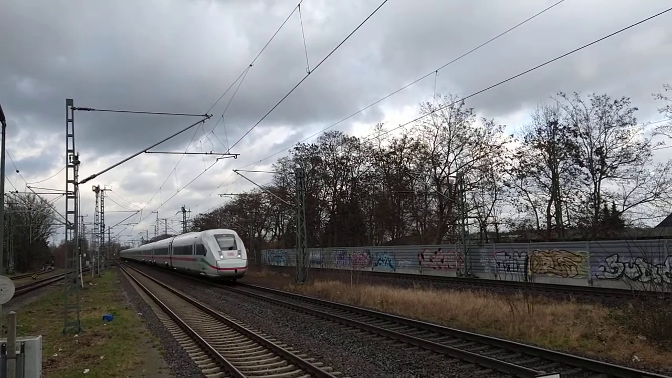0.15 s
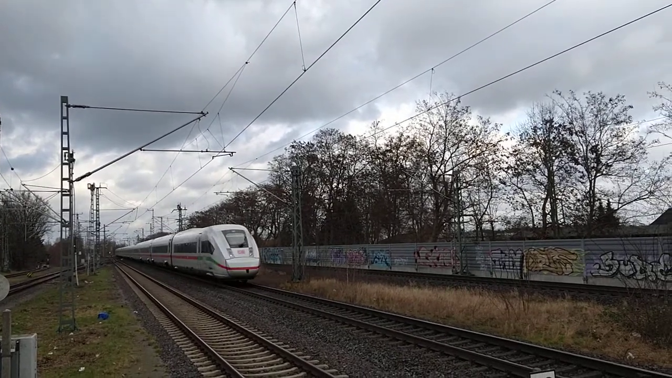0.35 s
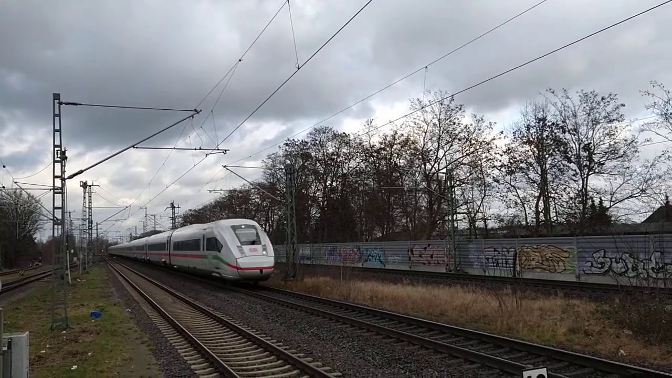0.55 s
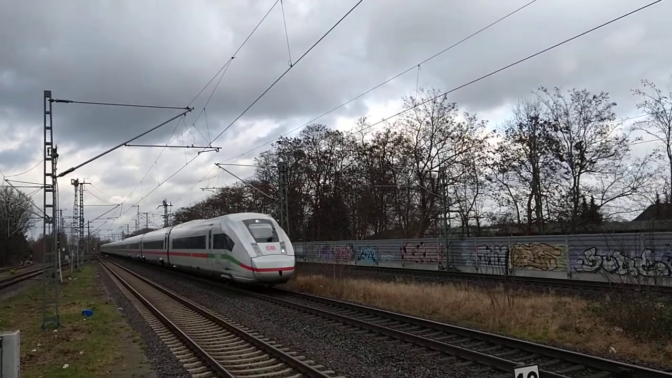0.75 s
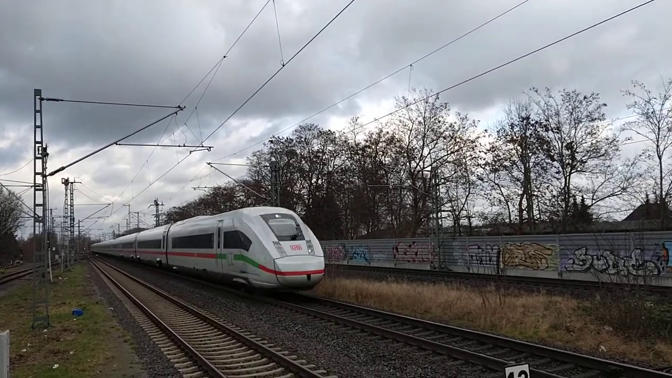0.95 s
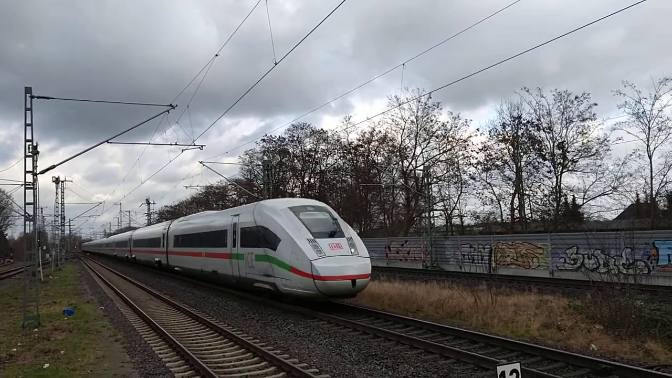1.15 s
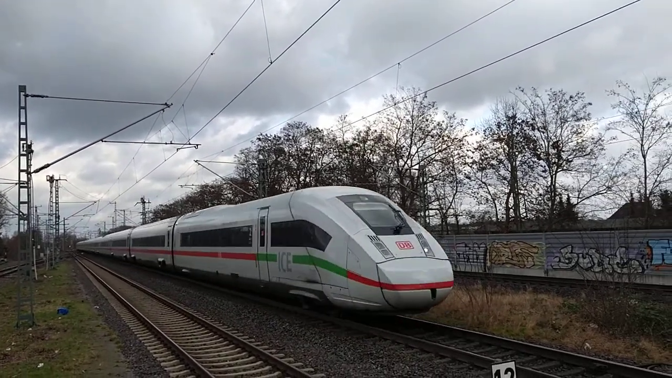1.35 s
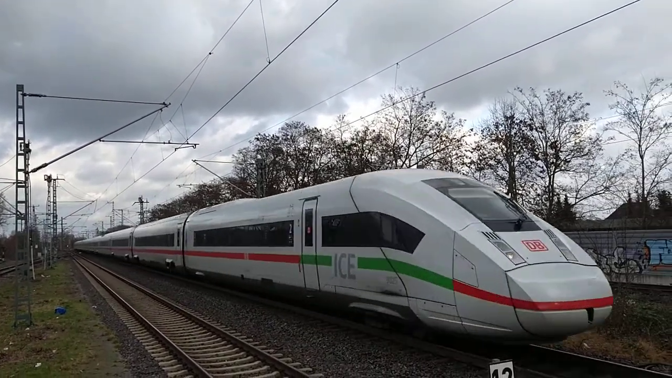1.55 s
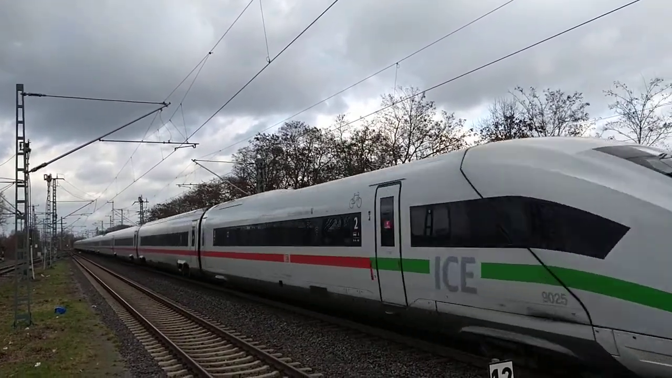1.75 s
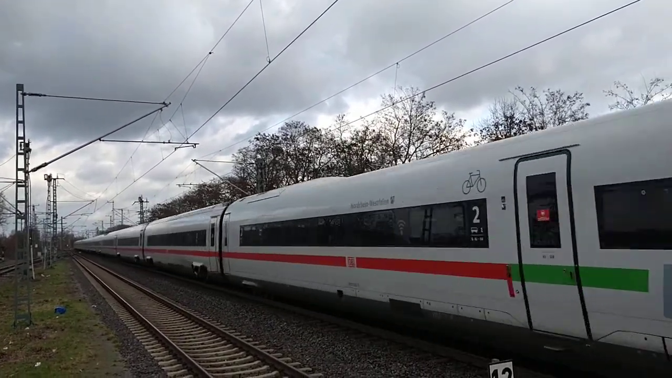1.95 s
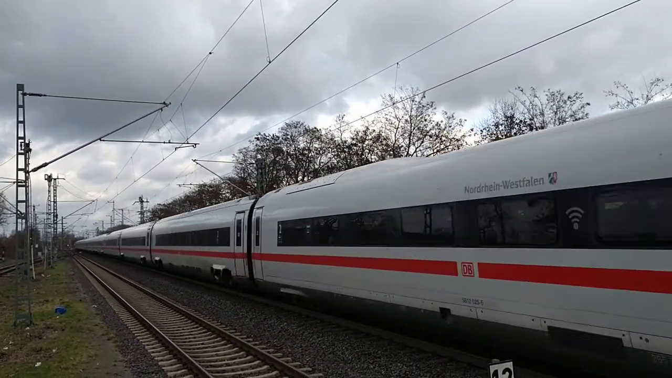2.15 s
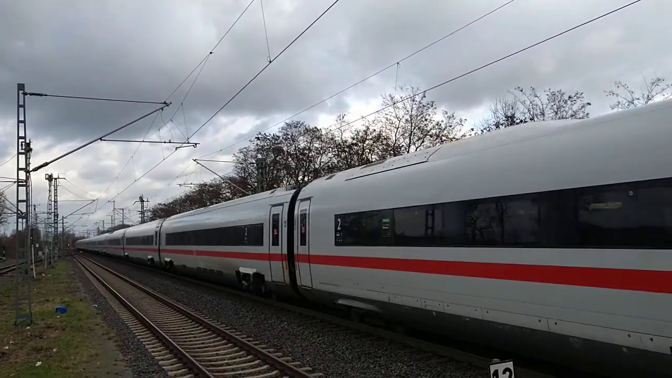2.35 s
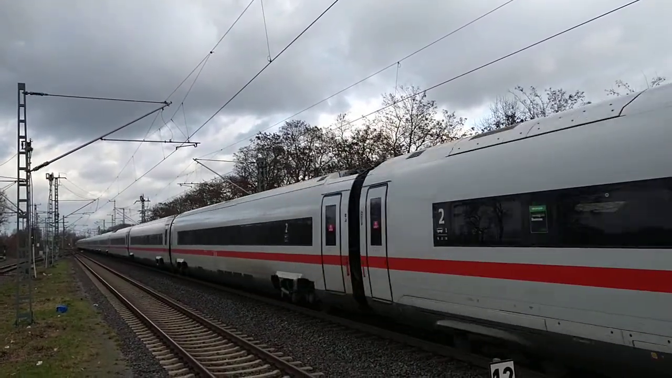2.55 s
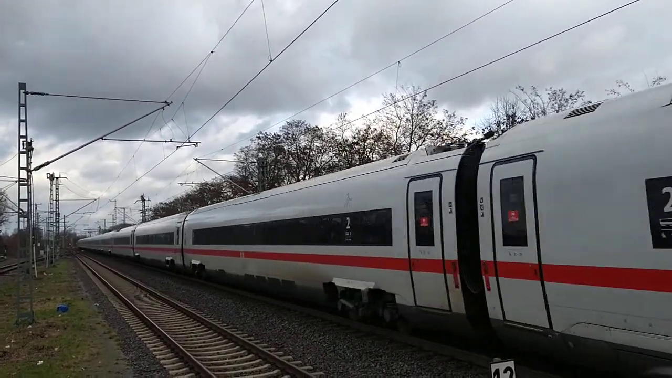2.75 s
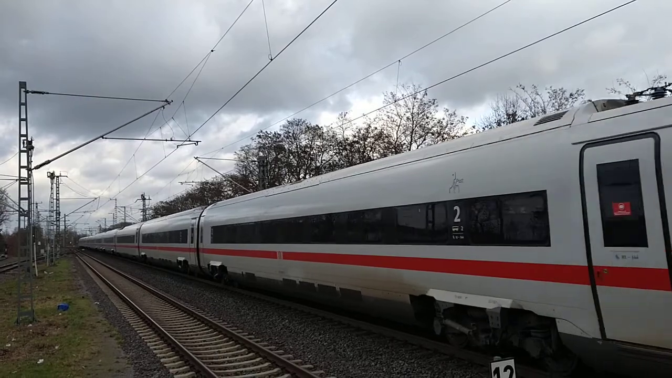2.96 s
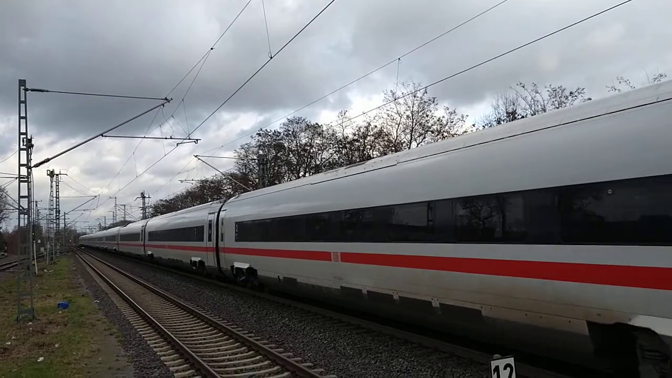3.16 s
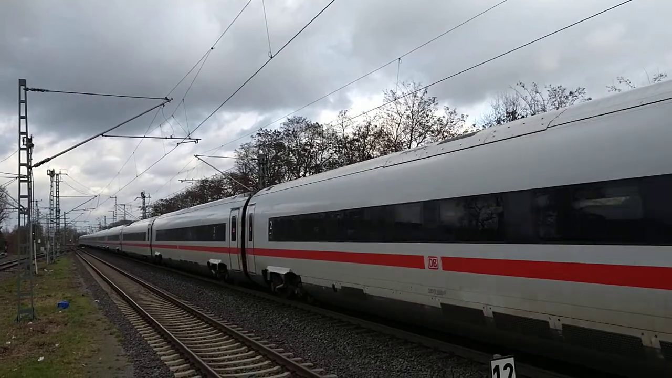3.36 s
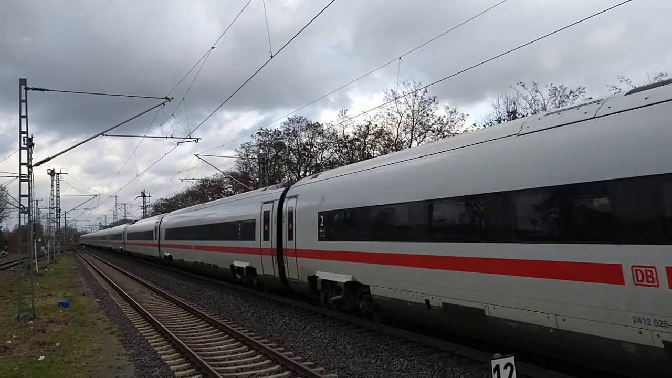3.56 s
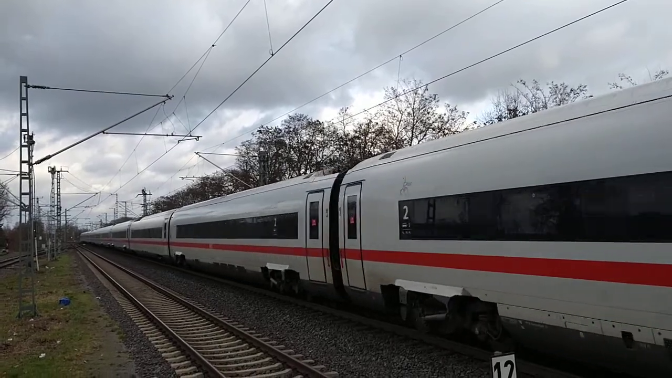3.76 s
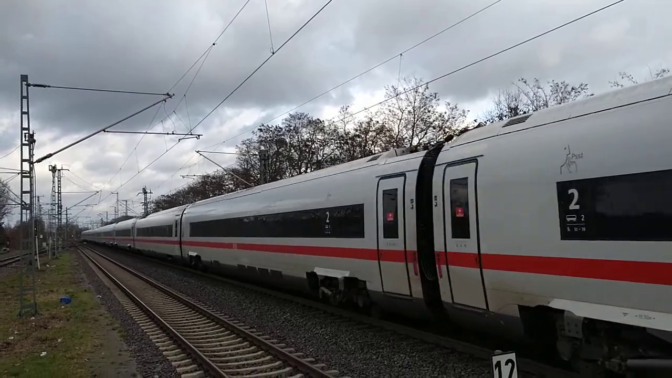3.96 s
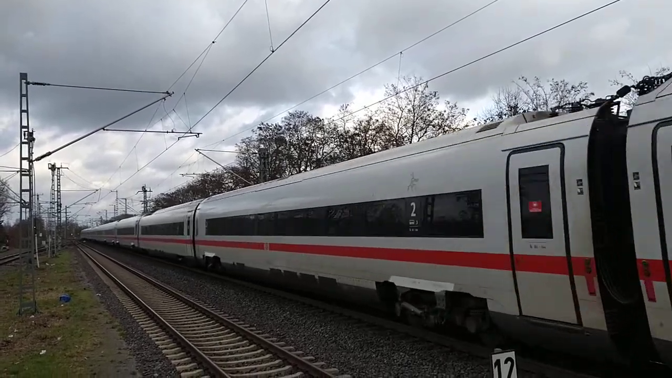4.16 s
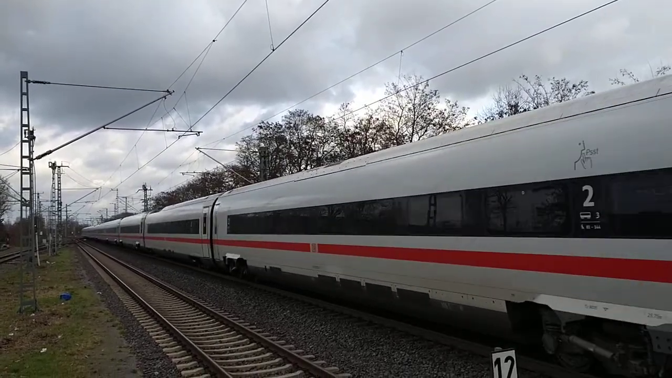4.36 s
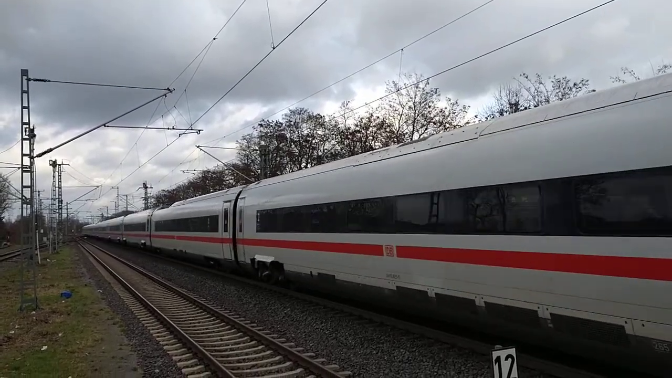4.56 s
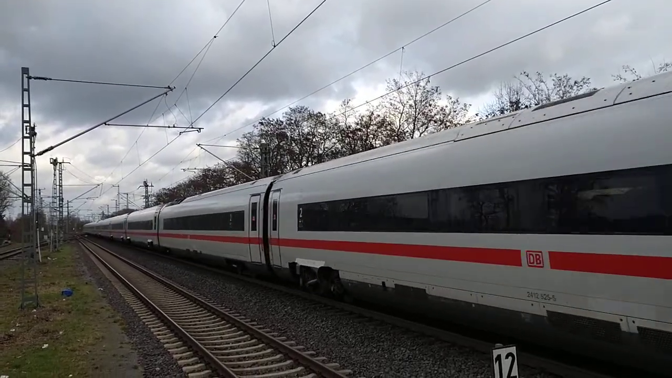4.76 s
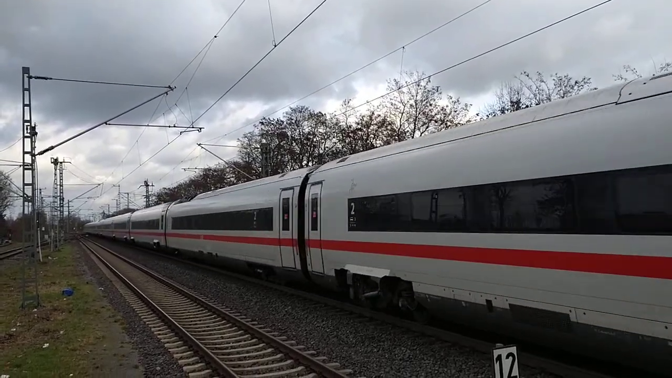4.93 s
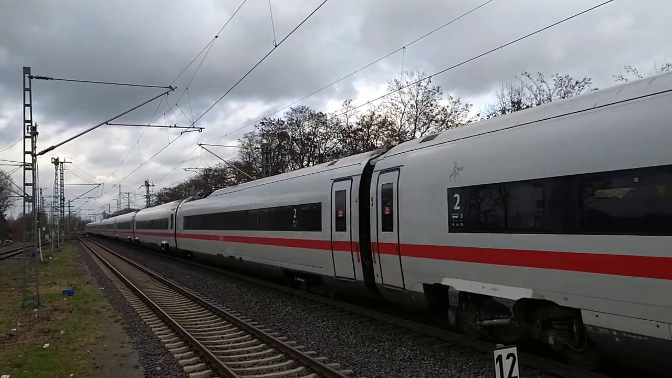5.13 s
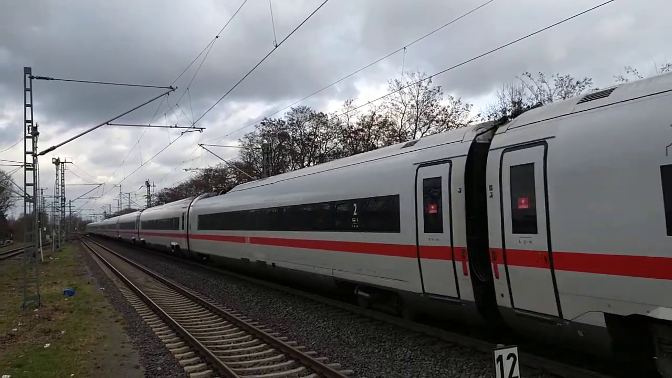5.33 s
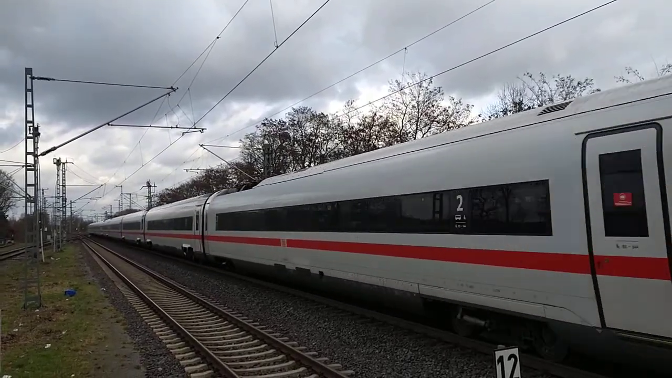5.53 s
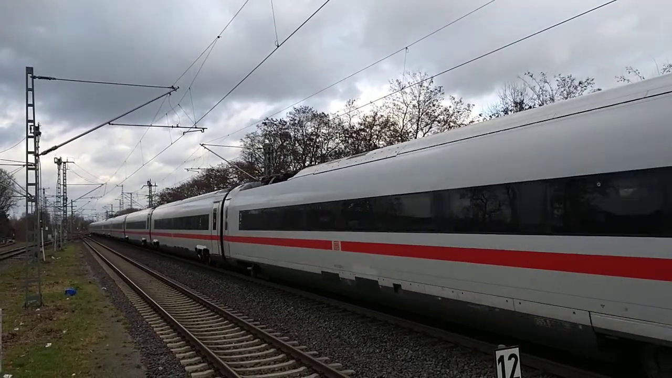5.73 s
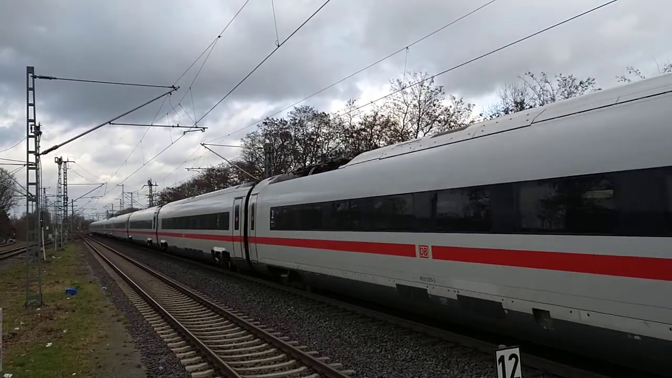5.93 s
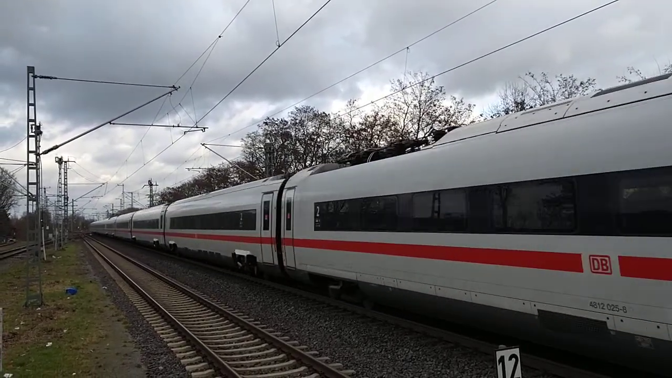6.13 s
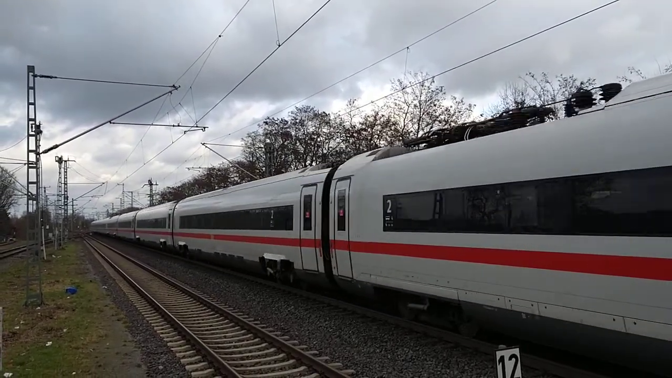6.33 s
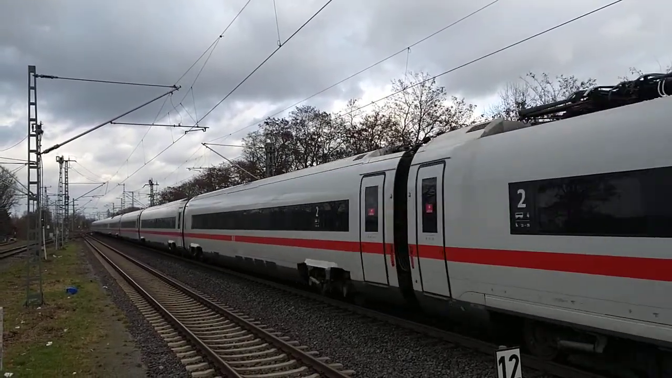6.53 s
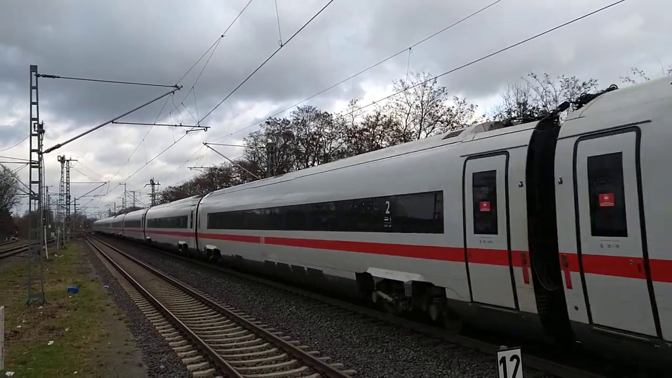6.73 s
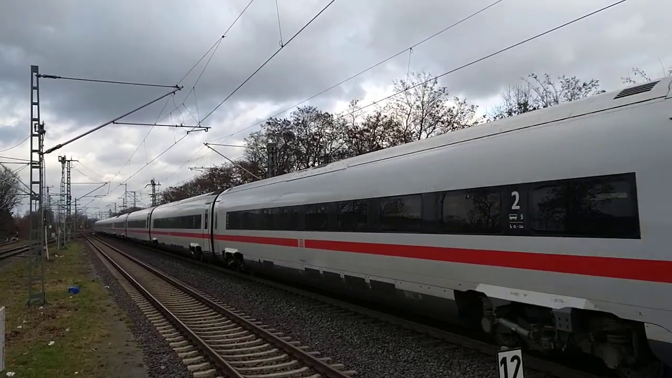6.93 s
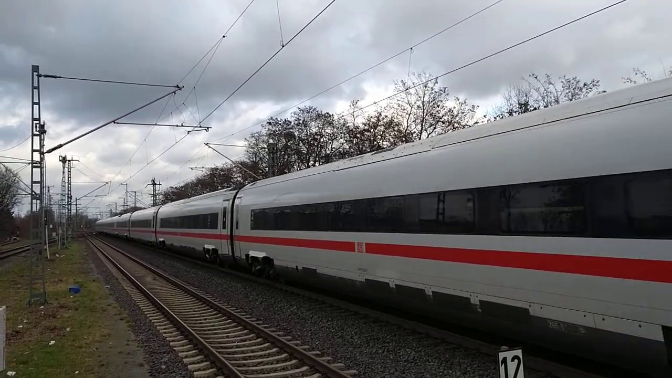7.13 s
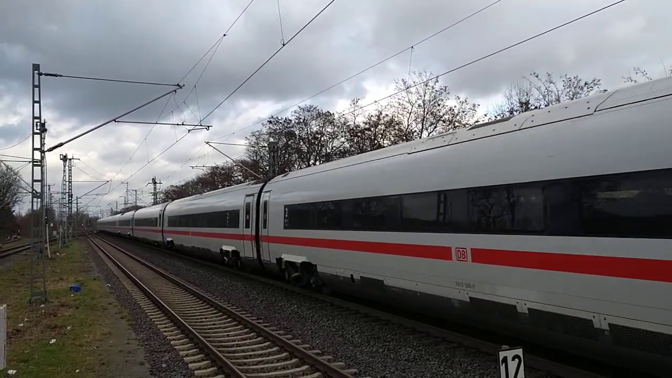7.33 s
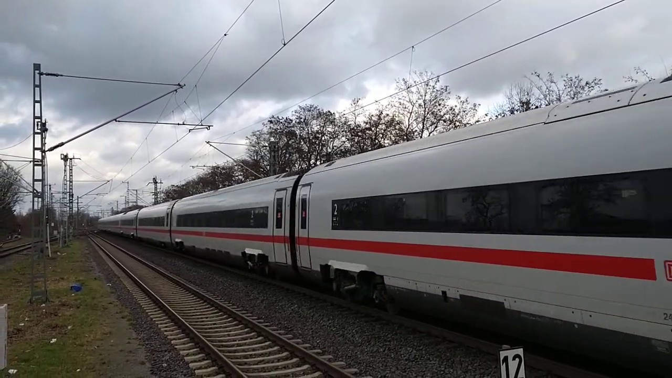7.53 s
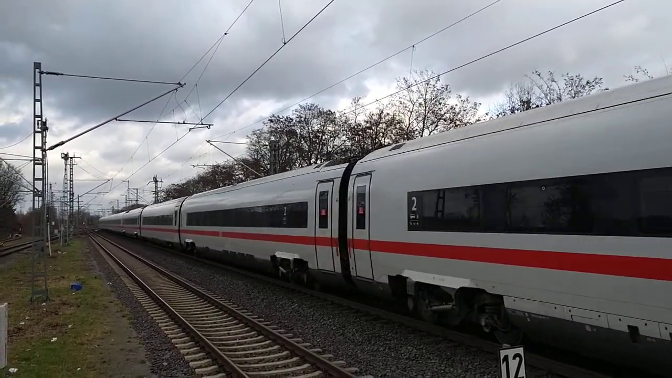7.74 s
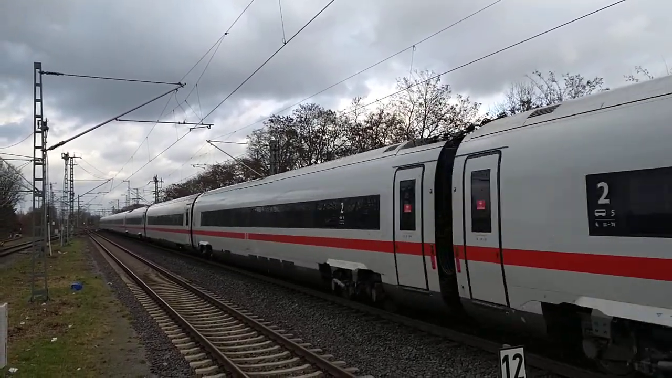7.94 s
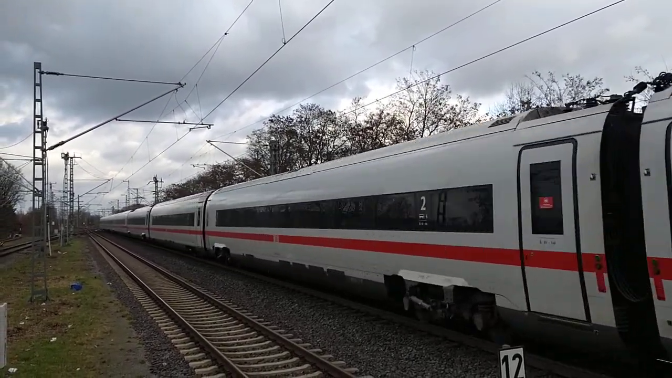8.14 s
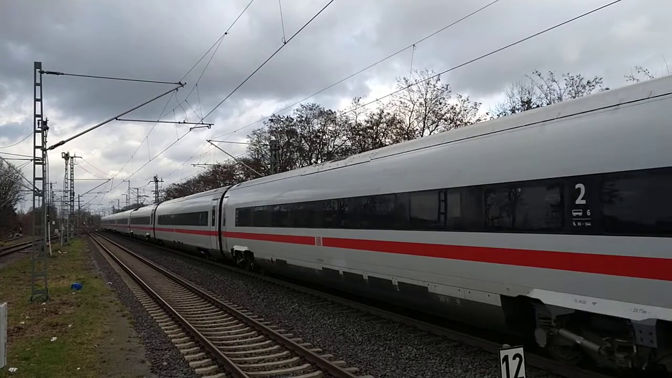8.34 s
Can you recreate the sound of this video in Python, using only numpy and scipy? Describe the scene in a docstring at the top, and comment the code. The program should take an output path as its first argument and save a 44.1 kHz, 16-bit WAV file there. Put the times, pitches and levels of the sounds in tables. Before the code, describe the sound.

A close stereo trackside microphone catches bumpy low wind, then the quickly swelling hiss and rumble of an electric train. Ringing wheel slaps tick about ten times a second until the front cars are alongside. Broad rushing noise surges with each set of wheels, coloured by breathy, wavering whines that fall as they pass. Later cars are smoother and quieter, ending in a softer hiss and whine with small wind bumps.

```python
"""Wind buffets a two-port microphone beside a railway; then an electric train, braking gently, runs past.
It passes 7 m away at its nearest. Rolling noise and air hiss are shaped noise sent from the bogies.
Whines are fuzzy tones that drop in pitch as they pass; two front wheels slap on a flat spot and ring.
Wind is lumpy low noise, unrelated between the ports, which gusts again as the train leaves."""
import sys
import numpy as np
from scipy import signal
from scipy.fft import rfft, irfft, next_fast_len
from scipy.io import wavfile
from scipy.ndimage import uniform_filter1d

SR = 44100
rng = np.random.default_rng(int(sys.argv[2]) if len(sys.argv) > 2 else 0)


def wrap_up_sound(samples):
    """Save the sound to the file named by the first command line argument, as 16-bit audio."""
    columns = np.atleast_2d(samples).T
    # keep every value between -1 and 1, then stretch to whole-number steps
    tamed = np.clip(columns, -1, 1)
    steps = np.round(tamed * 32767).astype(np.int16)
    wavfile.write(sys.argv[1], SR, steps)


N = 369999

# Place: m/s at the start, m/s lost each second, nearest distance in m
START_SPEED, BRAKING, TRACK_M = 24., .38, 7.
# Microphone: radians between track and microphone axis, longest delay between ports in s, top of the band
AIM_RAD, PORT_DELAY_S, EDGE_HZ = 0.46, 0.00042, 15650
# left minus right port: f/Hz, level/dB
PORT_COLOUR = [(60, -2), (99, 2), (160, 1), (270, 1), (450, 3), (740, 1), (1220, 2.5), (1500, 0.5),
               (1650, 3.5), (2010, -4), (3330, 5.5), (5500, -0.5), (9080, 7), (15000, 5)]
# phase by which the left port leads by itself: f/Hz, phase/rad
PORT_PHASE = [(100, 0), (380, -.2), (520, -.6), (820, -.3), (1000, -1.3), (1200, -2), (1450, -1),
              (1750, -.7), (1950, .9), (2200, .9), (2600, 1), (5000, 0)]
# share of the delay between ports that shows: f/Hz, share
DELAY_SHARE = [(300, .7), (520, .45), (820, .6), (1000, .1), (1200, .3), (1450, 1), (1750, 1), (1900, .25),
               (2700, .2), (12000, .12)]
# likeness of the ports for one bogie: f/Hz, likeness (held to 0..1)
PORT_LIKENESS = [(60, 0.99), (250, 1), (700, 0.8), (1600, 0.36), (2100, 0.44), (2700, 0.26), (4000, 0.029),
                 (12000, 0.086)]

# wind on the ports: middle t/s, half length/s, level/dB, left minus right/dB
GUSTS = [(0.02, 0.044, -23, 8), (0.077, 0.017, -22, 12), (0.14, 0.029, -23.5, 15), (0.18, 0.21, -32, 9),
         (0.204, 0.026, -23, 14), (0.266, 0.015, -22, -2), (0.346, 0.032, -23, 9), (0.403, 0.033, -37, 3),
         (0.512, 0.033, -41.5, 10), (0.795, 0.18, -40, -2), (1.297, 0.13, -43, -2), (1.95, 0.13, -33, -10),
         (2.542, 0.035, -38, 12), (7.917, 0.044, -43, -5.5), (8.135, .03, -37.5, -5),
         (8.194, 0.033, -38, 7), (8.238, 0.012, -28, -15), (8.37, .03, -41, 12)]
# wind spectrum: f/Hz, relative level per Hz/dB
WIND_COLOUR = [(15, -55), (25, -27), (73, -5), (102, -5.5), (325, -18.5), (397, -35), (430, -26.5),
               (460, -36), (600, -52), (780, -82), (1320, -120)]
BREEZE_DB = -64  # between the gusts

# wheels with a flat spot: first slap t/s, no slap from t/s, first turn/s, abreast t/s, level abreast/dB
FLAT_WHEELS = [(0.672, 2.86, .0982, 2.28, -15.5), (2.986, 3.3, .114, 2.94, -14)]
# ringing modes of a wheel, before motion shifts them: f/Hz, relative level/dB, t60/s
WHEEL_MODES = [(825, -2, 0.041), (1000, 6.5, 0.035), (1360, -3, 0.03), (1760, -4, 0.029),
               (3200, -24, 0.011), (4260, -11, 0.011)]
TURN_GROWS_S, FLAT_SPREAD_DB = .00055, 2.5  # each turn longer by this; spread of slap strength
FLAT_FADE = 1.4  # power of distance

# motor, gear and wheel whines: abreast t/s, f there/Hz, fuzz/Hz, loudest level/dB, loudest this far ahead/m,
# loss before/dB per m, loss after/dB per m (either loss is at least .1)
WHINES = [(2.3, 392, 10, -44.5, 24, 0.2, 0), (2.05, 988, 56, -36, 2.5, 1, 0.5),
          (2.45, 740, 36, -34, 16, .5, .2), (2.997, 2196, 180, -31, -3.5, 1, -0.5),
          (3.35, 1740, 55, -36, 2.5, 3, 1), (3.1, 1280, 17, -36, 0.5, 0.2, 0),
          (3.4, 2130, 46, -22.5, 4.5, 1, .55), (3.32, 3300, 380, -32, 0, 2, 2),
          (3.4, 2135, 16, -35, 24, .5, 1.5), (3.25, 2190, 170, -28, 1, 1.2, 1.2),
          (4.35, 2100, 170, -28, 0, 1, 1), (3.33, 789, 32, -29.5, 3, 1, 1.4),
          (3.5, 835, 17, -33, -3, 0.74, -1), (3.4, 378, 11, -30, -3.5, .6, 1.6),
          (3.55, 410, 9, -34, -3, .4, 1.5), (4.1, 2090, 35, -25.5, 4.5, 0.7, 0.1),
          (4.298, 845, 9.4, -30, 3.5, 0.5, 7), (4.25, 370, 10, -31, -5, 1.2, 1),
          (4.33, 402, 8, -31.5, -5, .8, 1.5), (4.8, 1680, 90, -35, 2.5, 0.2, -2.5),
          (4.67, 2060, 46, -22, 5.5, .5, 1.9), (4.67, 2060, 36, -34, -8, 1, .4),
          (4.73, 832, 22, -25, 0.5, 1.5, 1), (4.7, 368, 8, -29.5, -7, 1.2, 1),
          (4.9, 397, 8, -32.5, -8, .3, 2), (5.45, 364, 7, -31.5, -7, 1.2, .8),
          (5.6, 2020, 30, -26.5, 13.5, 2.2, 1.8), (5.6, 2020, 50, -27.5, 0, .6, 1.1),
          (5.6, 2020, 14, -36, -20, .4, 1), (5.72, 808, 30, -20.5, 5.5, 1.2, 1.2),
          (5.72, 808, 30, -22, -3, 1, 1.5), (5.1, 372, 57, -33.5, 0, .15, 0.15),
          (5.651, 397, 9.4, -34, 1.5, 1.9, 0), (6.2, 1610, 48, -35.5, 1.5, 0.5, 2),
          (7.25, 2745, 38, -41, -6.5, 2, 2.5), (6.6, 3100, 70, -42, 0, 2, 2),
          (7.3, 3650, 140, -40.5, 0, 1, 2), (7.33, 785, 32, -25.5, 10, 1, .75),
          (7.3, 1955, 44, -34.5, 5, .4, .9), (7.3, 1560, 32, -33, -3.5, .3, .9),
          (8.25, 699.5, 100, -40.5, 11.5, 2, 0), (8.3, 775, 32, -39, 9, 0.7, 2),
          (8.4, 320, 80, -42.5, 2, 1, 1), (8.3, 1915, 30, -41, 10.5, 2, 1),
          (8.22, 2700, 45, -44, 0, 1.5, .5), (8.35, 2110, 50, -47, 4, 0, 6),
          (8.3, 1524, 20, -34, 8, 2, 1.8), (8.3, 1524, 32, -28.5, .5, 1.6, 1.4),
          (8.38, 1145, 17, -40, 4, 2, 3), (8.301, 3055, 60, -42.5, 1, 2, 3)]
# loss at the right port for a whine square to the left port: f/Hz, loss/dB
SHADE = [(400, 0.5), (800, 2.5), (1500, 9), (2100, 4), (4000, 3)]
# phase the left port gains once a whine is behind the microphone body: f/Hz, phase/rad
BEHIND_PHASE = [(1700, 0), (1900, 2.9), (2400, 2.9), (2700, 0)]
SHADE_SHARP = 4  # power of the bearing: how narrow that shadow is
BEHIND_M, BEHIND_SPAN_M = 5.5, 1.5  # metres past abreast, and how gradually
BREAK_DB = 1  # spread of level as each whine comes and goes in short patches
BEAM_M = 2.5  # how rounded the top of each beam is
REACH_M, BEYOND_DB_PER_M = 22, 0.48  # past this distance along the track every whine fades faster

# bogies: abreast t/s, relative strength/dB
BOGIES = [(1.9, -12), (3.0, -6), (3.4, -1), (4.25, 1.5), (4.65, -4.5), (5.4, -6), (5.7, 2.5), (6.799, 5.5),
          (7.3, 7), (8.3, 1), (8.75, 5.5)]
# whole train: t/s, air hiss level/dB, rolling above the hiss/dB
RUSH_LEVELS = [(0.05, -59, 5), (0.186, -56, 1.5), (0.791, -46, -3), (1.84, -33.5, -4), (2.16, -31.5, -5.5),
               (2.61, -32, -3), (2.86, -29, -3.5), (3.37, -28, -2.5), (3.55, -29.5, -3.5),
               (3.75, -31, -3.5), (4.18, -27.5, -3), (4.6, -27, -5), (4.8, -29, -5), (5.02, -31, -4.5),
               (5.3, -29.5, -4.5), (5.62, -28, -4.5), (5.95, -29, -5.5), (6.27, -31, -5.5),
               (6.46, -31.5, -5), (6.88, -29.5, -4.5), (7.25, -32, -3), (7.76, -39.5, -7),
               (8.27, -37.5, -5.5), (8.39, -36.5, -7.5)]
# low bands: t/s, boom level/dB, rumble level/dB
LOW_LEVELS = [(0, -41, -46), (1, -42, -46), (1.4, -38.5, -39.5), (1.9, -34.5, -33.5), (2.5, -36.5, -35),
              (3.3, -34.5, -38.5), (3.7, -36, -39), (4.2, -45, -43.5), (5, -48, -44), (5.8, -55, -48),
              (6.6, -48, -49), (7.3, -49.5, -51), (7.9, -45.5, -48), (8.39, -40, -46)]
# spectra of boom and rumble: f/Hz, relative level per Hz/dB
BOOM_COLOUR = [(15, -57), (25, -27), (41, 3), (54, 7), (102, 6), (130, -15), (170, -31), (290, -120)]
RUMBLE_COLOUR = [(59, -32), (100, -19), (145, 0), (270, 1), (312, -5.5), (340, -3), (440, -9), (750, -120)]
# rolling while approaching (the ground echo carves notches), with the front cars alongside,
# and with the quieter rear cars: f/Hz, relative level per Hz/dB
ROLL_FAR = [(150, -37), (250, -39.5), (371, -20), (417, -20.5), (619, -10), (826, -3), (1080, -10.5),
            (1120, -5.5), (1190, -14.5), (1290, -15.5), (1420, -14), (1580, -9.5), (1780, -21), (2300, -8),
            (2610, -24.5), (3200, -22), (4160, -65), (7040, -120)]
ROLL_NEAR = [(120, -56), (200, -10.5), (322, -14.5), (379, -9), (483, -12.5), (623, -12), (824, -2),
             (958, -9.5), (1150, -9), (1320, -12.5), (1600, -9.5), (1830, -11), (2160, -6.5), (2340, -9),
             (2600, -17), (3200, -19), (4160, -18.5), (7040, -120)]
ROLL_REAR = [(120, -42), (200, -20), (287, -12), (345, -3.5), (506, -14.5), (616, -8.5), (795, -1.5),
             (873, -10), (1170, -8.5), (1290, -21), (1540, 4.5), (1860, -8.5), (2260, -2.5), (2570, -9),
             (3200, -12), (4160, -40), (7040, -120)]
# air hiss while approaching, and alongside: f/Hz, relative level per Hz/dB
HISS_FAR = [(1410, -26), (2400, 5.5), (2570, -32), (2800, -9), (3030, -23), (3200, -12), (3400, -14),
            (3540, -3.5), (3700, -14), (3900, -19), (4500, -19.5), (4850, -32), (5100, -21), (5400, -33),
            (5600, -17.5), (6400, -16.5), (6760, -12), (7560, -22.5), (8290, -4.5), (8550, -13),
            (8800, -20), (9100, -31), (9400, -19), (9800, -27), (10050, -11), (10500, -17), (10850, -26),
            (11100, -29), (11500, -33), (15000, -49), (22000, -120)]
HISS_NEAR = [(1410, -9), (2400, -38), (2680, -15), (3000, -8.5), (3370, -14), (4190, -5), (4870, -8.5),
             (5410, -6.5), (7320, -11), (9140, -12.5), (9760, -9.5), (11500, -25), (15000, -51),
             (22000, -120)]
# sizzle at the top while approaching, and alongside: f/Hz, relative level per Hz/dB
SIZZLE_FAR = [(6470, -15), (9800, 1), (11000, 4), (12100, -23), (12500, -1), (13200, -7), (13600, -22),
              (15500, -33)]
SIZZLE_NEAR = [(6470, -9.5), (11000, -12.5), (15500, -30)]
# one colour gives way to the next: t/s, span/s
ROLL_ARRIVES, HISS_ARRIVES, REAR_ARRIVES = (2.3, 0.27), (1.53, 0.21), (7.76, 0.48)
# above the hiss; alongside, the sizzle swings further than the hiss, and the near value holds at the pivot
SIZZLE_FAR_DB, SIZZLE_NEAR_DB = -12.5, -17.5
SIZZLE_SWING, SIZZLE_PIVOT_DB = 0.2, -30.5
HOP, SIZE = 256, 1024  # samples between noise frames, samples in a frame


def gain_of(db):
    """Turn dB into gain."""
    return 10 ** (np.asarray(db) / 20)


def read(points, hz):
    """Read a spectrum table at the given frequencies, straight along log frequency."""
    f, value = np.transpose(points)
    return np.interp(np.log(hz + 1), np.log(f + 1), value)


def band_gain(table, hz, lo, hi):
    """Gains of a spectrum whose power between lo and hi sums to 1."""
    g = gain_of(read(table, hz))
    return g / np.linalg.norm(g[(hz > lo) & (hz < hi)])


def complex_noise(*shape):
    """Complex noise of power 1."""
    pairs = rng.standard_normal((*shape, 2), np.float32)
    return pairs.view(np.complex64)[..., 0] * np.float32(np.sqrt(.5))


def smooth_noise(shape, width, axis=-1):
    """Slow random drift: noise averaged twice over a window, scaled to a spread of 1."""
    drift = rng.standard_normal(shape)
    for _ in range(2):
        drift = uniform_filter1d(drift, width, axis)
    return drift / drift.std()


def blend(first, then, when, t):
    """Let one gain give way to the next, evenly in dB, along an S-curve in time."""
    middle_s, span_s = when
    share = 1 / (1 + np.exp((middle_s - t[:, None]) / span_s))
    return first ** (1 - share) * then ** share


def sight(abreast_s, t):
    """Metres still ahead, distance, pitch factor and left-port delay of a point on the train."""
    speed, speed_abreast = START_SPEED - BRAKING * t, START_SPEED - BRAKING * abreast_s
    ahead = (abreast_s - t) * (speed + speed_abreast) / 2
    distance = np.hypot(ahead, TRACK_M)
    doppler = 1 / (1 - speed * ahead / distance / 343)
    pitch = speed / speed_abreast * doppler
    delay = PORT_DELAY_S * np.sin(np.arctan2(TRACK_M, ahead) - AIM_RAD)
    return ahead, distance, pitch, delay


def wind():
    """Turbulence on the ports: lumpy low noise, unrelated between them, swelling in short gusts."""
    size = next_fast_len(N)
    t, hz = np.arange(N) / SR, np.fft.rfftfreq(size, 1 / SR)
    white = rng.standard_normal((2, size))
    noise = irfft(rfft(white) * gain_of(read(WIND_COLOUR, hz)), size)[:, :N]
    noise *= gain_of(2.0 * smooth_noise((2, N), 600))
    power = gain_of(BREEZE_DB) ** 2
    for middle_s, half_s, db, pan_db in GUSTS:
        port_gain = gain_of([[db + pan_db / 2], [db - pan_db / 2]])
        power = power + port_gain ** 2 * np.exp(-2 * ((t - middle_s) / half_s) ** 2)
    return noise / noise.std() * np.sqrt(power)


def wheel_flat():
    """Each slap of a flat spot, once a turn of the slowing wheel, rings the wheel briefly."""
    out, t = np.zeros((2, N)), np.arange(4000) / SR
    turns = np.arange(24)
    for first_s, last_s, turn_s, abreast_s, db in FLAT_WHEELS:
        slaps = first_s + turn_s * turns + TURN_GROWS_S * turns ** 2 / 2
        for slap_s in slaps[slaps < last_s]:
            _, distance, pitch, delay = sight(abreast_s, slap_s)
            ring = np.zeros(len(t))
            for f, mode_db, t60 in WHEEL_MODES:
                phase = rng.uniform(0, 2 * np.pi)
                ring += gain_of(mode_db - 60 * t / t60) * np.sin(2 * np.pi * f * pitch * t + phase)
            ring *= gain_of(db + FLAT_SPREAD_DB * rng.standard_normal())
            ring *= (TRACK_M / distance) ** FLAT_FADE
            ring *= 1 - np.exp(-t / 0.0022)  # soft onset
            for port, late_s in enumerate((delay, 0)):
                at = round((slap_s + late_s) * SR)
                out[port, at:at + len(t)] += ring
    return out


def whines():
    """Fuzzy tones tied to wheel speed and shifted by the motion; each beams its own way and fades far off."""
    slow, out = np.arange(0, N / SR + 1, 1 / 800), np.zeros((2, N))
    for abreast_s, hz, fuzz_hz, db, top_m, before, after in WHINES:
        ahead, _, pitch, delay = sight(abreast_s, slow)
        pole = np.exp(-1.5 * np.pi * fuzz_hz * slow[1])
        waver = signal.lfilter([1], np.poly([pole, pole]), complex_noise(3, len(slow)))
        waver /= waver.std()
        ports = 0.41 + 0.72 * waver[0] + 0.41 * waver[1:]  # a steady core, shared fuzz, scattered fuzz
        pitch *= 1 + 0.00301 * smooth_noise(len(slow), 64)  # wheels creep and sway

        ports[0] *= np.exp(-2j * np.pi * hz * pitch * delay * read(DELAY_SHARE, hz))
        bearing = np.maximum(delay / PORT_DELAY_S, 0)
        ports[1] *= gain_of(-read(SHADE, hz) * bearing ** SHADE_SHARP)
        behind = 1 / (1 + np.exp(np.minimum((ahead + BEHIND_M) / BEHIND_SPAN_M, 50)))
        ports[0] *= np.exp(1j * read(BEHIND_PHASE, hz) * behind)

        off_m = np.hypot(ahead - top_m, BEAM_M) - BEAM_M
        level_db = db - np.maximum(np.where(ahead > top_m, before, after), .1) * off_m
        level_db -= BEYOND_DB_PER_M * np.maximum(abs(ahead) - REACH_M, 0)
        ports *= np.sqrt(2) * gain_of(level_db + BREAK_DB * smooth_noise(len(slow), 60))

        heard = slow[level_db > -66]
        at = np.arange(round(heard[0] * SR), min(round(heard[-1] * SR), N))
        tone_hz = np.interp(at / SR, slow, hz * pitch)
        turn = np.exp(2j * np.pi * np.cumsum(tone_hz) / SR)
        for k in range(2):
            out[k, at[0]:at[-1] + 1] += (np.interp(at / SR, slow, ports[k]) * turn).real
    return out


def bogie_noise(t, hz):
    """Every bogie sends its own noise from its own direction; ballast and the far wall scatter the rest."""
    shape = len(t), len(hz)
    direct, power = np.zeros((2, *shape), np.complex64), 0
    for abreast_s, db in BOGIES:
        _, distance, _, delay = sight(abreast_s, t)
        g = gain_of(db) / distance ** 1.09
        z = g[:, None] * complex_noise(*shape)
        lag = np.complex64(-2j * np.pi * delay[:, None] * hz * read(DELAY_SHARE, hz))
        direct[0] += z * np.exp(lag)
        direct[1] += z
        power = power + g ** 2
    like = np.clip(read(PORT_LIKENESS, hz), 0, 1)
    return np.sqrt(like / power[:, None]) * direct + np.sqrt(1 - like) * complex_noise(2, *shape)


def rush_power(t, hz):
    """Power of boom, rumble, rolling, hiss and sizzle added up, each spectrum following its own level."""
    (s, *high), (low_s, *low) = np.transpose(RUSH_LEVELS), np.transpose(LOW_LEVELS)
    air, roll = (gain_of(np.interp(t, s, c))[:, None] for c in high)
    boom, rumble = (gain_of(np.interp(t, low_s, c))[:, None] for c in low)
    power = (boom * band_gain(BOOM_COLOUR, hz, 40, 110)) ** 2
    power = power + (rumble * band_gain(RUMBLE_COLOUR, hz, 110, 280)) ** 2

    far, near, rear = (band_gain(c, hz, 1050, 1500) for c in (ROLL_FAR, ROLL_NEAR, ROLL_REAR))
    front = blend(far, near, ROLL_ARRIVES, t)
    power += (air * roll * blend(front, rear, REAR_ARRIVES, t)) ** 2

    far, near = (band_gain(c, hz, 2700, 10500) for c in (HISS_FAR, HISS_NEAR))
    power += (air * blend(far, near, HISS_ARRIVES, t)) ** 2

    swing = (air / gain_of(SIZZLE_PIVOT_DB)) ** SIZZLE_SWING
    near_gain = gain_of(SIZZLE_NEAR_DB) * swing
    sizzle = air * blend(gain_of(SIZZLE_FAR_DB), near_gain, HISS_ARRIVES, t)
    far, near = (band_gain(c, hz, 11000, 15600) for c in (SIZZLE_FAR, SIZZLE_NEAR))
    return power + (sizzle * blend(far, near, HISS_ARRIVES, t)) ** 2


def rush():
    """The body of the train: bogie noise coloured frame by frame, stirred in patches and all bands together."""
    frames, hz = N // HOP + 5, np.fft.rfftfreq(SIZE, 1 / SR)
    t = np.arange(frames) * HOP / SR
    power = rush_power(t, hz)
    patches = uniform_filter1d(uniform_filter1d(rng.standard_normal(power.shape), 12, 0), 14, 1)
    flutter = uniform_filter1d(rng.standard_normal(frames), 5)  # axles and gaps stir all bands together
    stir_db = 0.84 * patches / patches.std() + .5 * flutter[:, None] / flutter.std()
    # the 3 makes up for power that unrelated frames lose where they overlap
    z = bogie_noise(t, hz) * np.sqrt(3 * power) * gain_of(stir_db)
    return signal.istft(z.swapaxes(1, 2), nperseg=SIZE, noverlap=SIZE - HOP)[1][:, :N]


def scene():
    """All sources at the two ports."""
    return wind() + wheel_flat() + whines() + rush()


def record(dry):
    """The ports differ in colour and phase and lose the deepest bass; then the band limit."""
    size = next_fast_len(N + SIZE)
    hz = np.fft.rfftfreq(size, 1 / SR)
    bass_cut = 1 / np.sqrt(1 + (56 / (hz + 1)) ** 8)
    gain = gain_of(np.outer([.5, -.5], read(PORT_COLOUR, hz))) * bass_cut + 0j
    gain[0] *= np.exp(1j * read(PORT_PHASE, hz))
    coloured = irfft(rfft(dry, size) * gain, size)[:, :N]
    low_pass = signal.firwin(1023, EDGE_HZ, window=("kaiser", 9), fs=SR)
    return signal.oaconvolve(coloured, low_pass[None], "same")


dry = scene()
out = record(dry)
wrap_up_sound(out)
```